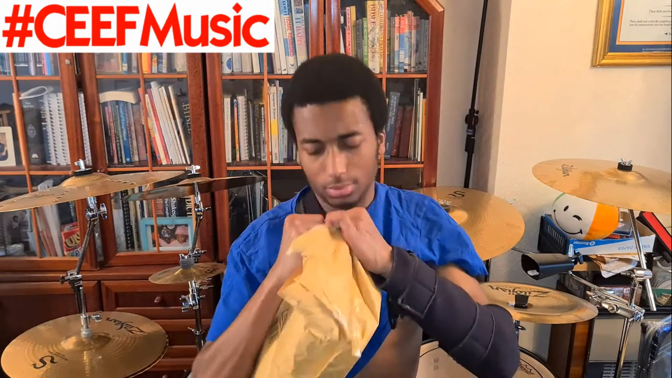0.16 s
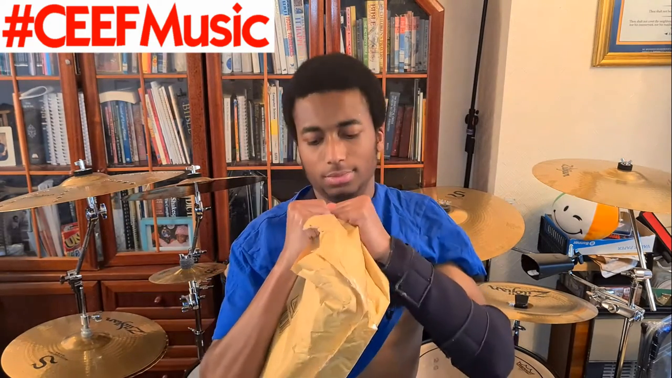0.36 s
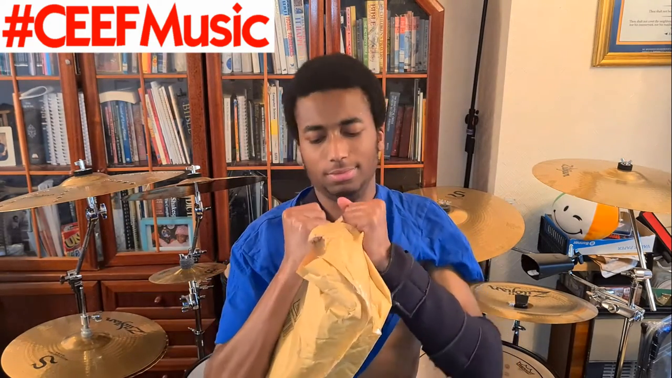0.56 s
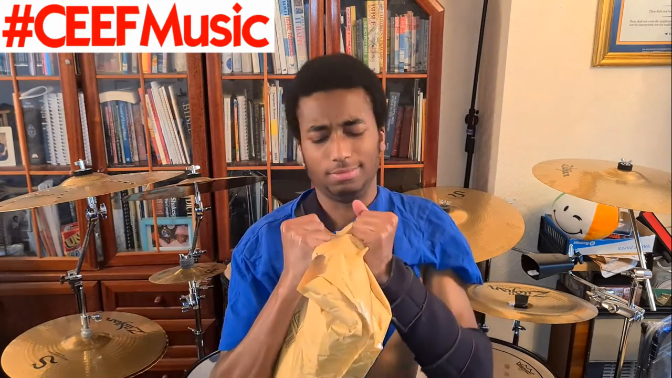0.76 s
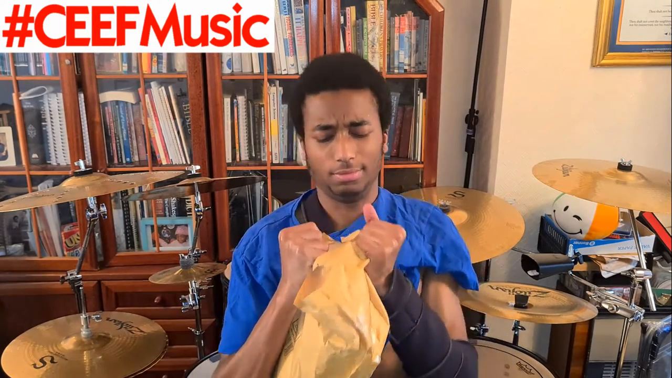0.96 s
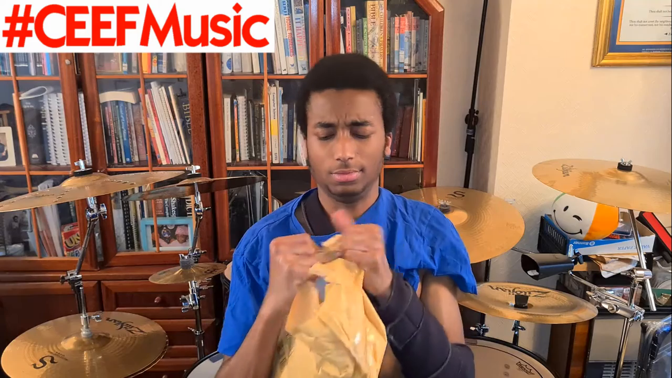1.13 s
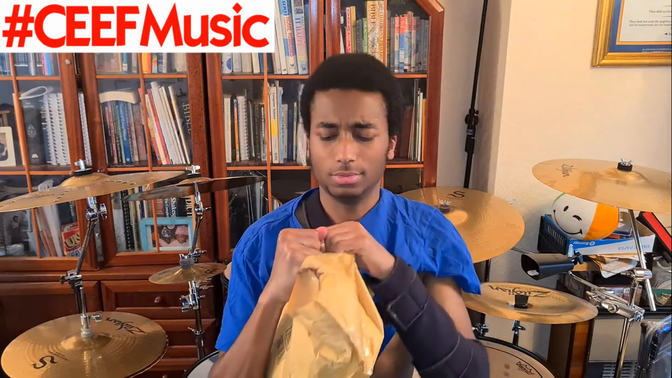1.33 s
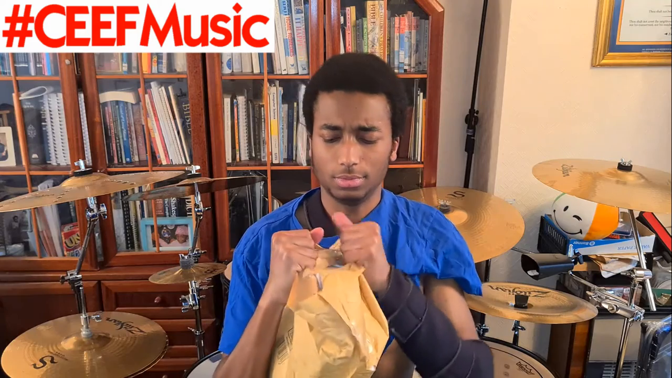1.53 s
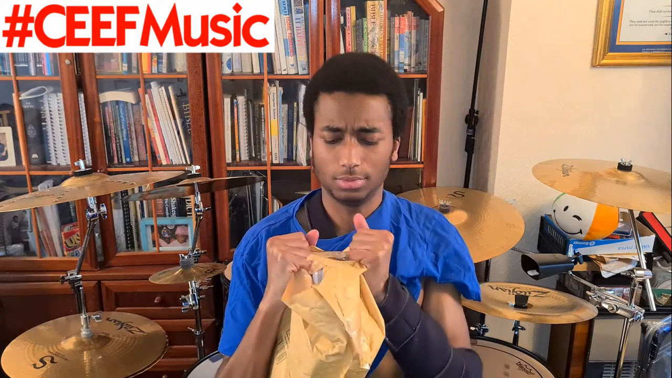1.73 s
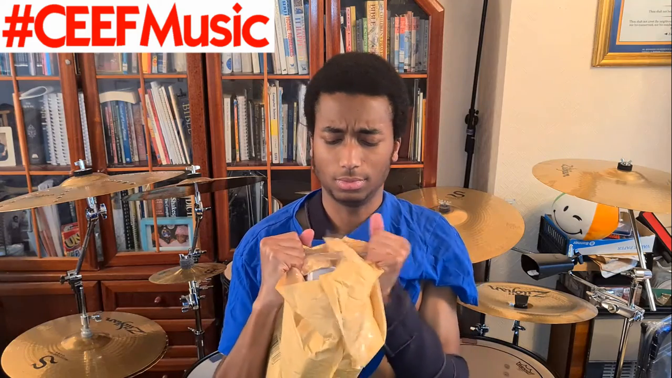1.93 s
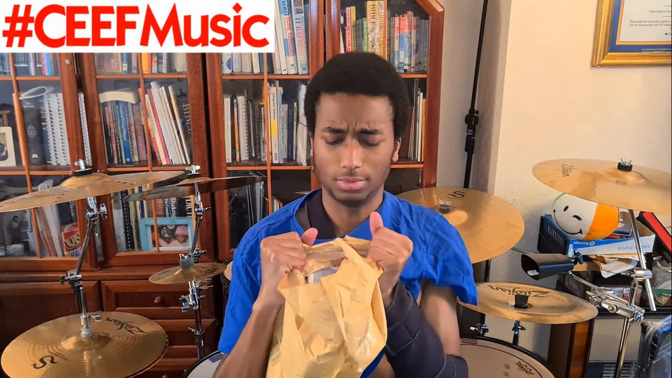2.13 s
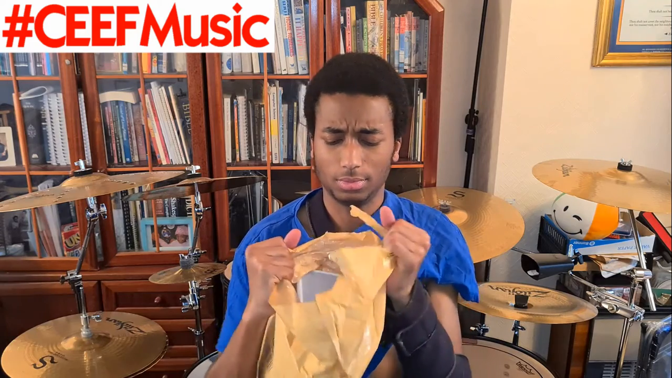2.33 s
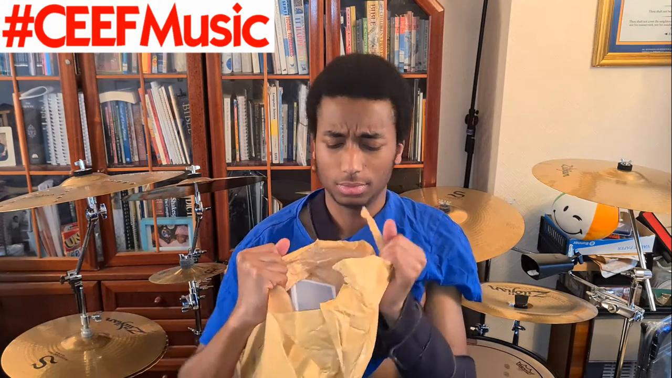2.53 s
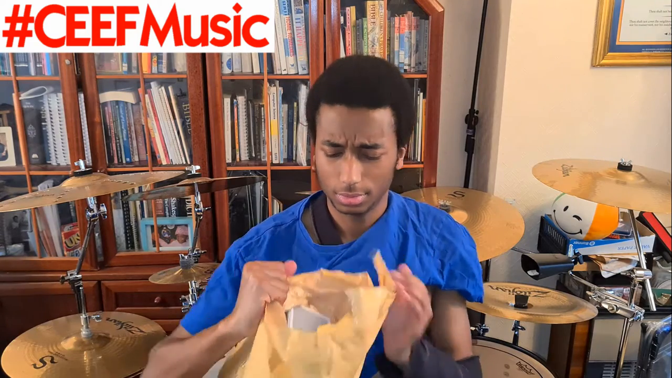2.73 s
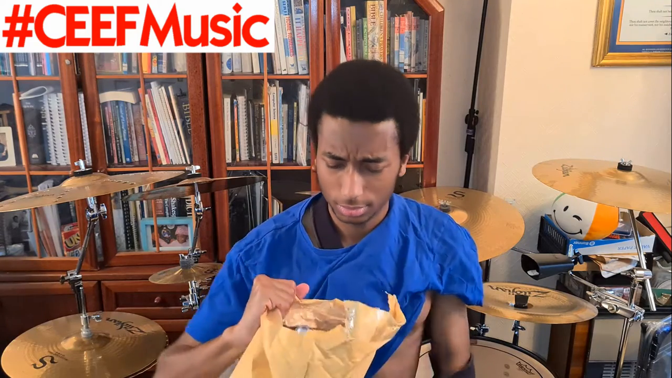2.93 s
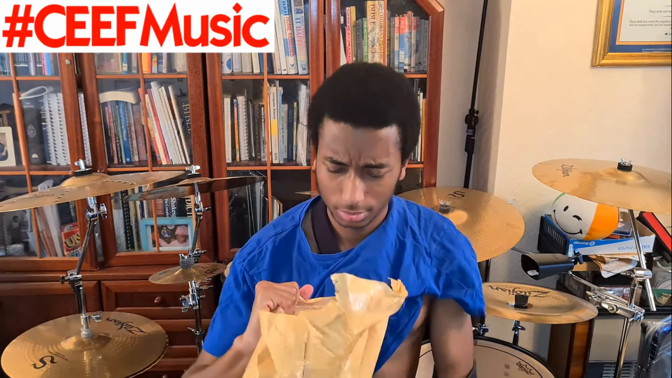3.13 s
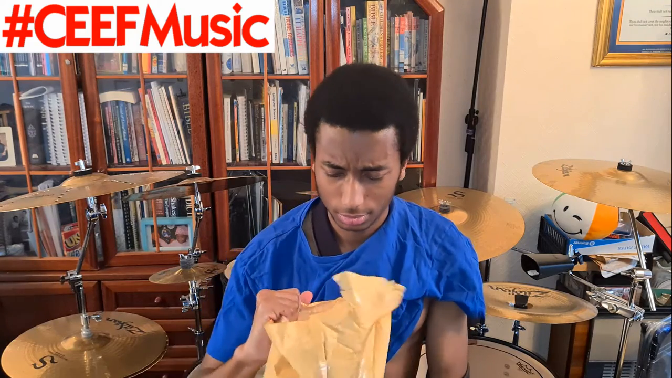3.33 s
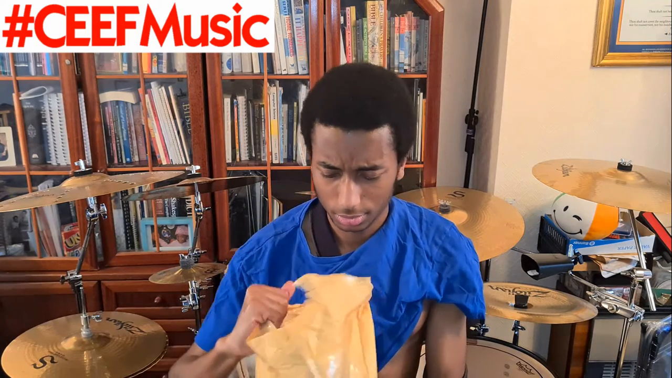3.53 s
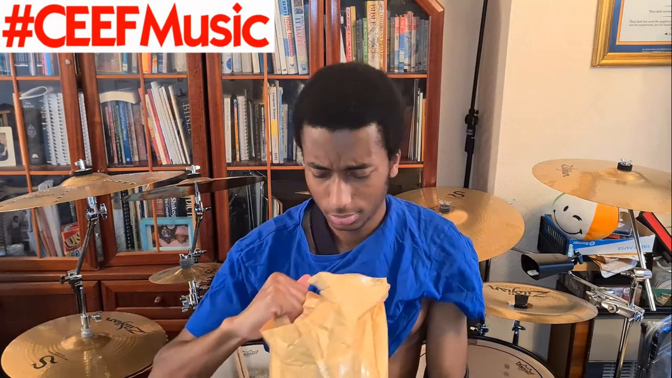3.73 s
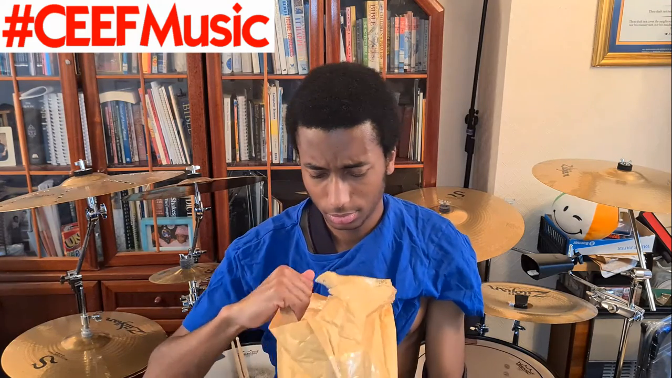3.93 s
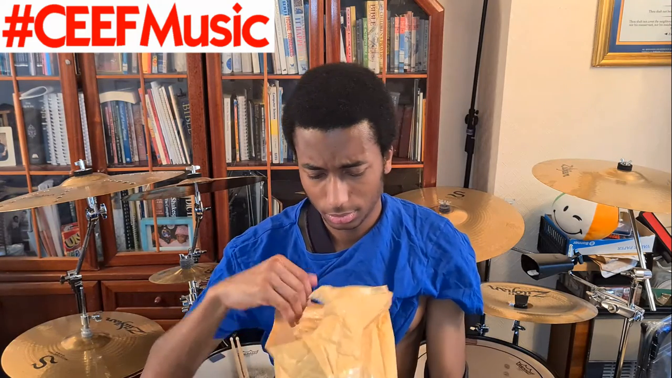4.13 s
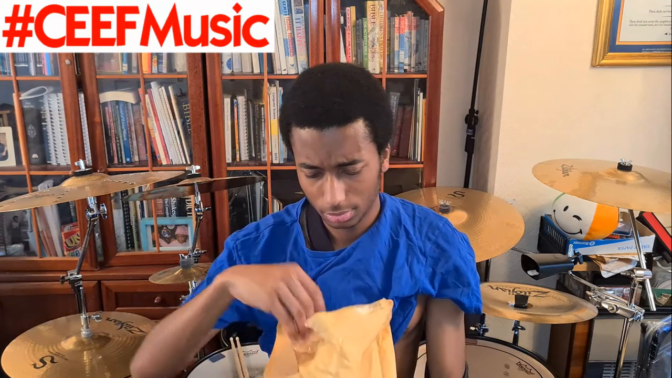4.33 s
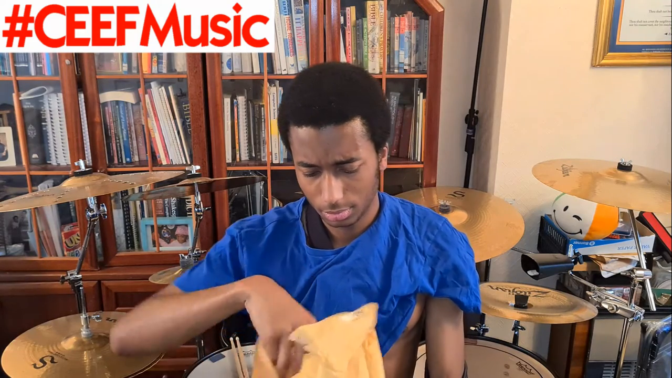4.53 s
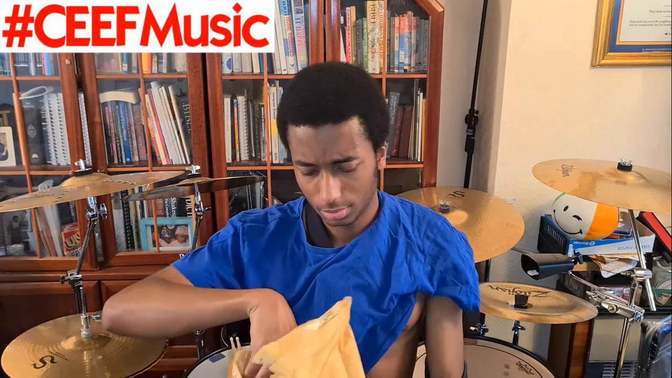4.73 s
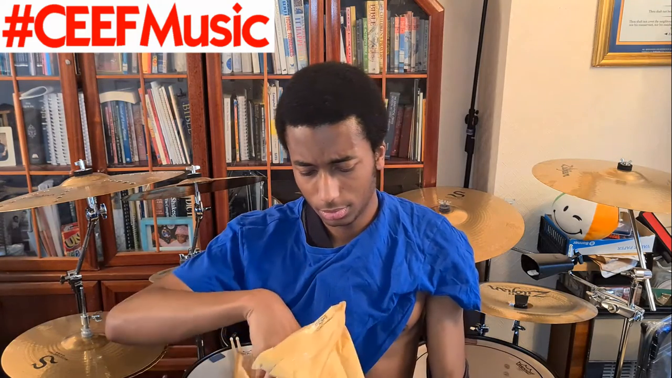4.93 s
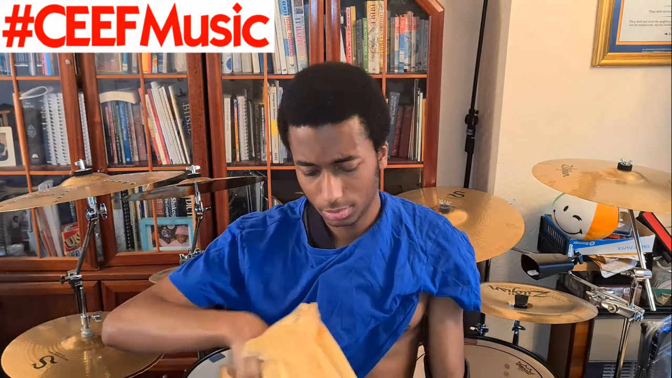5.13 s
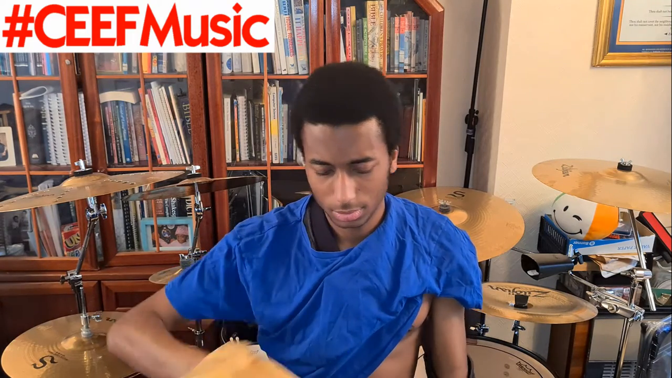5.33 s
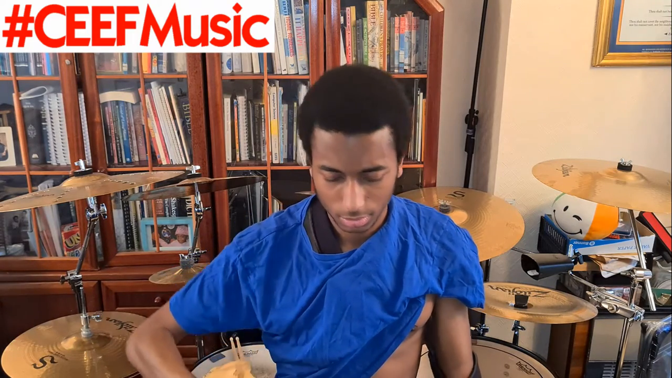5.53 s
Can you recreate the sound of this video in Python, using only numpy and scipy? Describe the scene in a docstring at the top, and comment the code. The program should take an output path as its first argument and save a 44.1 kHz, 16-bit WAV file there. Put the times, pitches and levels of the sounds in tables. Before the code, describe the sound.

Hands rip open a padded paper mailer in short crackling bursts, then rustle it more quietly indoors.

```python
"""Tearing open a padded mailer

A small furnished room; a pair of microphones about a metre from the hands, taking in much of the room.
A padded paper mailer is torn open, pulled wide, reached into and put aside. Fibres part in dense bright
crackle, creases rustle, fingers rub, the pouch flexes and caves in with low thumps, and now and then
a stiff panel buckles with a snap."""
import sys
import numpy as np
from scipy import signal
from scipy.fft import rfft, irfft
from scipy.io import wavfile
from scipy.ndimage import uniform_filter1d

SR = 44100
rng = np.random.default_rng(int(sys.argv[2]) if len(sys.argv) > 2 else 0)


def generate_wav(signal):
    """Clip the signal to [-1, 1] and save it as 16-bit WAV at the path in sys.argv[1]."""
    frames = np.transpose(np.atleast_2d(signal))
    scaled = np.clip(frames, -1, 1) * 32767
    pcm = np.round(scaled).astype(np.int16)
    wavfile.write(sys.argv[1], SR, pcm)


N = 246078
TIME = np.arange(N) / SR

# Levels in all tables are relative; each source adds its own gain.
# the flap rips, starting with a jerk: start_s, end_s, level_db
FLAP_RIPS = [(0.362, 0.44, -45), (0.444, 0.571, -34), (0.598, 0.667, -40.5), (0.662, 0.782, -30.5),
             (0.839, 0.895, -35.5), (0.924, 0.981, -37.5), (1.143, 1.205, -44.5), (1.735, 1.81, -43.5),
             (1.864, 1.955, -32.5), (2.195, 2.276, -36), (3.555, 3.61, -42.5)]
# faint ringing shared by the whole envelope: pitch_hz, width_hz, level_db
ENVELOPE_MODES = [(475, 70, -3), (650, 120, -6), (1095, 80, -2), (1275, 70, -4), (1710, 90, -1),
                  (1835, 90, -2), (2290, 130, -4), (2890, 90, -4)]
# colour of parting fibres: frequency_hz, level_db
FIBRE_SPECTRUM = [(300, -33), (1500, -7), (3500, -10), (5000, -10), (7000, -7), (8200, -11), (10000, -8),
                  (11800, -2.5), (13500, -2.5), (15500, -5)]
# colour of sharp creases: frequency_hz, level_db
CREASE_SPECTRUM = [(1000, -10), (2200, -3), (3000, 0), (4500, -1), (6800, -4.5), (8200, -14), (16000, -7.5)]
# colour of the pouch's flexing: frequency_hz, level_db
FLEX_SPECTRUM = [(30, -13.5), (60, -13.5), (110, -9.5), (180, -3), (280, -1.5), (400, -4), (600, -11),
                 (1500, -30)]


def handling():
    """Fibres tear, broad and sharp creases fold and the pouch flexes; harder work makes more clicks."""
    # fingers slide over the paper with a faint hiss: start_s, end_s, level_db
    slides = [(0.168, 0.2, -40.5), (0.22, 1.03, -49.5), (1.105, 1.36, -52), (1.39, 2.06, -50.5),
              (2.09, 2.69, -52), (2.72, 2.9, -61), (2.93, 3.06, -59.5), (3.165, 3.66, -55.5),
              (3.76, 4.17, -62), (4.18, 4.34, -63), (4.374, 4.54, -56), (4.545, 4.72, -49.5),
              (4.78, 4.86, -57), (5.02, 5.2, -75.5), (5.335, 5.58, -63)]
    # colour of broad creases: frequency_hz, level_db
    rustle_spectrum = [(100, -33), (300, -15.5), (500, 4.5), (750, 5.5), (950, -1), (1300, 2.5),
                       (2000, 3.5), (2800, -4.5), (4000, -20), (8000, -42)]
    broad, sharp, flex = grips()
    sliding = np.hypot(strokes(slides, sag_db=-2), from_db(-74))   # paper hisses even when only held
    ripping = strokes(FLAP_RIPS, sag_db=-3.5)
    # gripping also parts fibres, and sliding also stirs creases
    fibres = np.linalg.norm([ripping, sliding, from_db(-11.5) * sharp], axis=0)
    broad = np.hypot(broad, from_db(-3) * sliding)
    sharp = np.hypot(sharp, from_db(-2.5) * sliding)
    breaks_per_s = 1200 + 2800 * np.sqrt(fibres / fibres.max())
    folds_per_s = 500 + 1100 * np.sqrt(broad / broad.max())
    breaks = grains(breaks_per_s, spread_db=3.2, even_s=0.03)
    folds = grains(folds_per_s, spread_db=3.5, even_s=0.035)
    tear = colour(fibres * facets(breaks, 5600, 12000, q=2.4), FIBRE_SPECTRUM)
    rustle = colour(broad * facets(folds, 400, 3000, q=3), rustle_spectrum, ENVELOPE_MODES)
    ticks = facets(folds + 1.37 * breaks, 1990, 10860, q=2.3)
    crinkle = colour(sharp * ticks, CREASE_SPECTRUM, ENVELOPE_MODES)
    return tear + from_db(-10.5) * rustle + from_db(-1.5) * crinkle + from_db(-3.5) * pouch(flex)


def grips(drop_db=10, roundness=1.21):
    """Each grip swells to its peak and relaxes; gains of broad creases, sharp creases and pouch."""
    # the hands squeeze or pull: peak_s, rise_s, fall_s, broad_db, sharp_db, flex_db
    squeezes = [(0.203, 0.027, 0.0184, -36, -53.5, -42), (0.402, 0.038, 0.11, -32.5, -49, -47),
                (0.506, 0.094, 0.025, -30, -33, -40), (0.598, 0.057, 0.048, -33, -44, -44.5),
                (0.672, 0.015, 0.061, -28, -38.5, -37), (0.754, 0.052, 0.046, -28.5, -35, -38.5),
                (0.87, 0.047, 0.032, -39.5, -42.5, -47.5), (0.937, .01, 0.025, -40.5, -59, -50),
                (1.19, 0.075, 0.13, -35.5, -41, -53), (1.451, 0.058, 0.029, -30, -36, -42.5),
                (1.6, 0.027, .03, -38, -40.5, -55), (1.70, 0.022, 0.033, -50, -48.5, -59),
                (1.791, 0.037, 0.026, -36.5, -40.5, -44.5), (1.875, 0.016, 0.011, -30.5, -52, -41),
                (1.939, 0.025, 0.031, -22, -31, -28), (2.272, 0.058, 0.016, -30, -30, -41.5),
                (2.375, 0.024, 0.03, -37.5, -42, -57), (2.49, 0.07, 0.16, -49.5, -73, -60),
                (2.641, 0.04, 0.044, -37, -44, -43), (3.218, 0.029, 0.12, -44.5, -64.5, -45),
                (3.43, 0.16, 0.16, -49, -47.5, -64), (3.588, 0.068, 0.058, -38.5, -41.5, -42),
                (3.84, 0.092, 0.075, -63, -58.5, -64), (4.026, 0.034, 0.019, -49, -48.5, -48),
                (4.605, 0.071, 0.054, -46, -47.5, -56), (4.659, 0.024, 0.07, -48.5, -48.5, -60),
                (4.80, 0.026, 0.041, -56.5, -55, -53), (5.399, 0.073, 0.063, -39, -57.5, -45),
                (5.471, .02, 0.039, -39, -53, -42), (5.56, 0.053, 0.081, -38.5, -61, -38.5)]
    power = np.zeros((3, N))
    for peak, rise, fall, *levels_db in squeezes:
        away = np.maximum((peak - TIME) / rise, (TIME - peak) / fall)   # in rise or fall times
        near = away < 5
        power[:, near] += from_db(np.array(levels_db)[:, None] - drop_db * away[near] ** roundness) ** 2
    return np.sqrt(power)


def strokes(table, sag_db, attack_s=0.0034, release_s=0.014):
    """A rip or slide jumps into motion, eases as the tension drops and dies away; its gain."""
    power = np.zeros(N)
    for start, end, db in table:
        along = np.clip((TIME - start) / (end - start), 0, 1)
        attack = np.clip((TIME - start) / attack_s, 0, 1)
        release = np.exp(-np.clip(TIME - end, 0, 1) / release_s)
        power += (attack * release * from_db(db + sag_db * along)) ** 2
    return np.sqrt(power)


def facets(clicks, low_hz, high_hz, q, count=14):
    """Each click rings one facet of the paper, with its own pitch and lag between the microphones."""
    facet_of, out = rng.integers(0, count, N), np.zeros((2, N))
    for k, hz in enumerate(np.geomspace(low_hz, high_hz, count)):
        ring = signal.lfilter(*signal.iirpeak(hz, q, fs=SR), clicks * (facet_of == k) + 1e-18)
        out += [ring, np.roll(ring, rng.integers(-3, 5))]
    return rms_one(out)


def buckles(panel_db=14, late_s=0.001112):
    """A buckle rings its panel, ticks along the crease and cracks fibres, louder ones during a rip."""
    # stiff panels give way: start_s, snap_db, pitch_hz, tick_db
    panels = [(0.203, -18, 1123, -53), (0.272, -24, 625, -45), (0.325, -27, 1680, -34.5),
              (0.372, -21, 1230, -30), (0.387, -17, 1120, -39), (0.492, -21.5, 1130, -50),
              (0.51, -20, 1840, -42), (0.662, -15.5, 1790, -25), (0.701, -18, 1130, -30.5),
              (0.742, -18, 1060, -26), (0.772, -15, 1670, -27.5), (0.871, -21.5, 1790, -35),
              (0.93, -20, 1340, -42), (1.135, -22, 1860, -45), (1.195, -18, 1890, -27.5),
              (1.327, -27.5, 1860, -53), (1.45, -19, 1720, -45), (1.456, -9, 688, -25),
              (1.463, -12, 1800, -23.5), (1.566, -15, 1740, -37), (1.588, -31.5, 1730, -26),
              (1.631, -30, 2310, -29), (1.648, -21.5, 2420, -31.5), (1.689, -18.5, 690, -49),
              (1.773, -25, 1864, -32.5), (1.912, -18.5, 1940, -42), (1.934, -8, 1720, -24),
              (1.94, -16, 507, -37), (2.203, -18.5, 650, -42), (2.267, -19.5, 1850, -45),
              (2.358, -15, 1870, -39), (2.38, -29, 1890, -33), (2.466, -32.5, 1710, -59),
              (2.639, -21.5, 640, -49), (3.205, -20, 706, -42), (3.259, -29, 640, -68),
              (3.371, -28, 2350, -45), (3.488, -30.5, 660, -38), (3.585, -24.5, 1230, -39),
              (3.676, -24.5, 1100, -45.5), (3.765, -37.5, 527, -57), (3.876, -34.5, 574, -66),
              (4.001, -32.5, 720, -57), (4.03, -32.5, 1830, -42.5), (4.545, -24.5, 1260, -34),
              (4.647, -30.5, 2070, -31), (4.785, -35.5, 1270, -44.5), (5.38, -20.5, 584, -47),
              (5.39, -20.5, 670, -53), (5.461, -24.5, 2100, -68), (5.543, -21.5, 1480, -52)]
    # colour of a panel's snap: frequency_hz, level_db
    snap_spectrum = [(100, -11), (400, 1.5), (800, -1), (2000, 0), (4000, -8), (6500, -33), (8500, -12.5),
                     (16000, -42.5)]
    out, crease = np.zeros((2, N)), body(CREASE_SPECTRUM, ENVELOPE_MODES)
    for s, snap_db, hz, tick_db in panels:
        width_hz = 170 + 0.05 * hz
        panel = body(snap_spectrum, [*ENVELOPE_MODES, (hz, width_hz, panel_db)])
        # a large, low panel gives way slowly and so has little treble
        panel = signal.sosfilt(signal.butter(2, 3.15 * hz, fs=SR, output="sos"), panel)
        snap = from_db(snap_db + 14.5) * slips(panel, decay_s=0.0032, per_s=3000, follow_db=-5.5)
        tick = from_db(tick_db + 23) * slips(crease, decay_s=0.0015, per_s=4400, follow_db=1.0)
        ripping = any(start <= s <= end for start, end, _ in FLAP_RIPS)
        crack = fibre_crack(tick_db + (-1 if ripping else -11.5))
        add(out, s + late_s, snap + tick + crack, lag=rng.integers(-1, 4))
    return out


def fibre_crack(db):
    """A few fibres part in one quick run."""
    return from_db(db + 25.5) * slips(body(FIBRE_SPECTRUM), decay_s=0.0023, per_s=11000, follow_db=-0.5)


def cracks():
    """Short bright fibre cracks, some alone, some on top of a buckle."""
    # a tough fibre breaks: start_s, level_db
    tough_fibres = [(0.234, -34.5), (0.443, -28.5), (0.603, -32.5), (0.93, -33), (1.109, -38.5),
                    (1.197, -29), (1.868, -26.5), (1.911, -27), (4.869, -52.5)]
    out = np.zeros((2, N))
    for s, db in tough_fibres:
        add(out, s, fibre_crack(db), lag=rng.integers(-1, 4))
    return out


def pouch(flex, opened_s=2.5):
    """The pouch flexes with a dull rumble and sets off a low ring, lower once it has opened."""
    # low ring that the flexing sets off before the pouch opens: pitch_hz, width_hz, level_db
    ring_before = [(306, 40, 7)]
    # lower rings once the pouch gapes and hangs slack: pitch_hz, width_hz, level_db
    rings_after = [(140, 45, 3), (185, 45, 6)]
    pushes = flex * grains(810, spread_db=0.5, even_s=0.063) * np.ones((2, 1))
    closed = colour(pushes * (TIME < opened_s), FLEX_SPECTRUM, ring_before)
    opened = colour(pushes * (TIME >= opened_s), FLEX_SPECTRUM, rings_after)
    return closed + opened


def thumps(width_hz=40, mode_db=12):
    """The pouch caves in with a thump and a short low ring, lower once it gapes."""
    # the pouch caves in: start_s, level_db, pitch_hz
    collapses = [(0.509, -45, 298), (0.742, -26, 300), (1.687, -35, 297), (1.935, -18, 304),
                 (1.94, -22, 249), (2.639, -33.5, 204), (3.583, -41, 130), (4.595, -35.5, 205),
                 (5.412, -29.5, 168), (5.461, -31, 145)]
    out = np.zeros((2, N))
    for s, db, hz in collapses:
        ring = body(FLEX_SPECTRUM, [(hz, width_hz, mode_db)])
        add(out, s, from_db(db + 19) * slips(ring, decay_s=0.0057, per_s=730, follow_db=-14), lag=0)
    return out


def rubs(q=20, step_db=-3.5):
    """Skin catches and slips on the paper and keeps a panel humming while the stroke swells and fades."""
    # a hand rubs a panel with three resonances: start_s, end_s, level_db, first_hz, second_hz, third_hz
    hand_strokes = [(2.228, 2.304, -35, 1736, 2275, 2850), (2.886, 3.063, -72, 765, 1760, 1310),
                    (3.388, 3.505, -47, 1886, 2020, 2470), (3.485, 3.541, -38.5, 766, 1750, 2870),
                    (3.766, 3.86, -60, 660, 2160, 1290), (4.45, 4.52, -51, 547, 1260, 3060),
                    (4.492, 4.617, -49, 695, 1290, 2700), (5.33, 5.424, -44.5, 590, 858, 1920)]
    out, friction = np.zeros(N), grains(3000, spread_db=4.5, even_s=0.019)
    for start, end, db, *pitches in hand_strokes:
        rings = [rms_one(signal.lfilter(*signal.iirpeak(hz, q, fs=SR), friction)) for hz in pitches]
        swell = np.sin(np.pi * np.clip((TIME - start) / (end - start), 0, 1))
        out += swell * sum(from_db(db + k * step_db) * ring for k, ring in enumerate(rings))
    return out


def room(x, build_s, bands=8, size=22050):
    """Direct sound, bounces off nearby things, then a diffuse tail that dies band by band."""
    # the room's echo at the microphones: frequency_hz, t60_s, left_right_likeness, level_db
    echo = [(118.2, 0.2, 0.87, -4), (410, .19, 0.87, -5.5), (1010, 0.2, 0.29, -1.5),
            (2700, 0.15, 0.072, 1.5), (7040, 0.27, 0.031, -6), (14900, 0.16, 0.02, 2)]
    # bounces off the cymbals and drums nearby: left_delay_s, right_delay_s, level_db
    bounces = [(.0012, .00127, -25), (.0021, 0.0028, -28.5), (.0038, .00374, -6.5)]
    t = np.arange(size) / SR
    response = np.zeros((2, size))
    edges = np.geomspace(40, 18000, bands + 1)
    for low, high in zip(edges, edges[1:]):
        hz = np.sqrt(low * high)
        band = signal.butter(2, [low, high], "band", fs=SR, output="sos")
        mid, side = signal.sosfilt(band, rng.standard_normal((2, size)))
        t60_s, alike, level_db = (at_hz(echo, hz, column) for column in (1, 2, 3))
        pair = np.sqrt(1 + alike) * mid + np.sqrt(1 - alike) * side * [[1], [-1]]
        response += from_db(level_db) * pair * np.exp(-np.log(1000) * t / t60_s)
    response *= 1 - np.exp(-(t / build_s) ** 2)
    response /= np.linalg.norm(response[0])   # the tail carries as much energy as the direct sound
    for left_s, right_s, db in bounces:
        response[[0, 1], [int(left_s * SR), int(right_s * SR)]] += from_db(db)
    response[:, 0] += 1
    # the room ripples the spectrum finely but adds no broad colour
    transfer = rfft(response)
    broad_power = uniform_filter1d(np.mean(np.abs(transfer) ** 2, axis=0), size=30)
    return convolve(x, irfft(transfer / np.sqrt(broad_power))[:, :size * 2 // 3])


def room_tone():
    """Steady low rumble and faint hiss, partly shared by the two microphones."""
    # the quiet room: frequency_hz, level_db
    air_spectrum = [(25, -20), (45, 9.5), (65, -11), (92, 5.5), (130, -12), (205, 1), (300, -11),
                    (600, -13), (1000, -33.5), (3500, -28.5), (6500, -11.5), (8300, -31.5), (12000, -18),
                    (16000, -13)]
    return colour(rng.standard_normal(N) + 1.15 * rng.standard_normal((2, N)), air_spectrum)


def grains(per_s, spread_db, even_s):
    """Random clicks of uneven size."""
    sizes = from_db(spread_db * np.minimum(rng.exponential(1, N), 4)) * rng.choice([-1, 1], N)
    clicks = sizes * (rng.random(N) < per_s / SR)
    # the hands feed in energy steadily, however it is shared among the clicks
    return clicks / np.sqrt(np.abs(uniform_filter1d(clicks ** 2, int(even_s * SR))) + 1e-6)


def slips(response, decay_s, per_s, follow_db, size=2048):
    """A fold gives way: one click, then a dying run of slips, all ringing a body; unit energy."""
    t = np.arange(size) / SR
    sizes = from_db(follow_db) * rng.standard_normal(size)
    run = sizes * (rng.random(size) < per_s / SR) * np.exp(-t / decay_s)
    run[0] = rng.choice([-1, 1])
    return unit_energy(signal.fftconvolve(run, response))


def body(spectrum, modes=(), size=4096):
    """Causal impulse response of unit energy: a broad spectrum with resonances standing on it."""
    hz = np.arange(size // 2 + 1) * SR / size
    peaks = 1 + sum(from_db(db) ** 2 * 2 / (1 + (2 * (hz - f) / width) ** 2) for f, width, db in modes)
    cepstrum = irfft(np.log(from_db(at_hz(spectrum, hz)) * np.sqrt(peaks)))
    # minimum phase: nothing rings before the click
    cepstrum[1:size // 2] *= 2
    cepstrum[size // 2 + 1:] = 0
    return unit_energy(irfft(np.exp(rfft(cepstrum))))


def colour(x, spectrum, modes=()):
    """Pass a sound through a body."""
    return convolve(x, body(spectrum, modes))


def convolve(x, response):
    """Pass both channels through an impulse response."""
    return signal.fftconvolve(x, np.atleast_2d(response), axes=1)[:, :N]


def add(track, s, sound, lag):
    """Put a sound on both channels, the right one offset by lag samples."""
    for channel, at in zip(track, (int(s * SR), int(s * SR) + lag)):
        channel[at:at + len(sound)] += sound[:N - at]


def at_hz(points, hz, column=1):
    """Read a column of a table on a log-frequency axis."""
    table = np.array(points)
    return np.interp(np.log(np.maximum(hz, 1)), np.log(table[:, 0]), table[:, column])


def from_db(db):
    """Decibels to gain."""
    return 10 ** (np.asarray(db) / 20)


def rms_one(x):
    """Scale to unit rms."""
    return x / np.sqrt(np.mean(x ** 2) + 1e-20)


def unit_energy(x):
    """Scale to a sum of squares of one."""
    return x / np.linalg.norm(x)


def scene():
    """The paper from about a metre away, over quiet room tone."""
    paper = handling() + rubs() + buckles() + cracks() + thumps()
    return room(paper, build_s=0.0017) + from_db(-66.5) * room_tone()


def record(dry, start_s=0.17, cutoff_hz=15950):
    """The sound cuts in abruptly; the left microphone is brighter; the top is cut."""
    treble = signal.sosfilt(signal.butter(1, 11000, "high", fs=SR, output="sos"), dry)
    microphones = dry + 0.197 * treble * [[1], [-1]]
    cut_in = np.where(TIME < start_s, from_db(-55), 1)
    return signal.sosfilt(signal.ellip(12, 0.1, 80, cutoff_hz, fs=SR, output="sos"), microphones * cut_in)


dry = scene()
out = record(dry)
generate_wav(out)
```